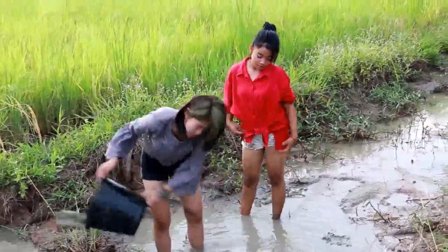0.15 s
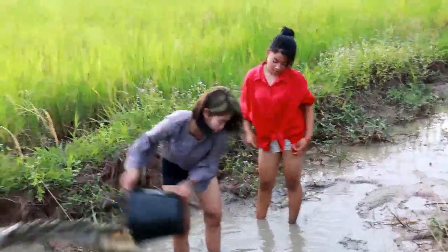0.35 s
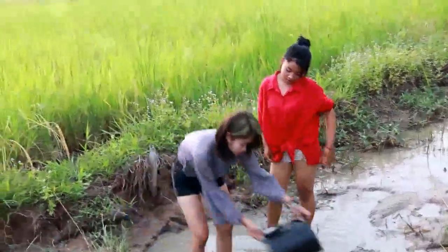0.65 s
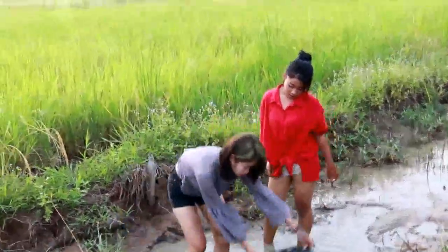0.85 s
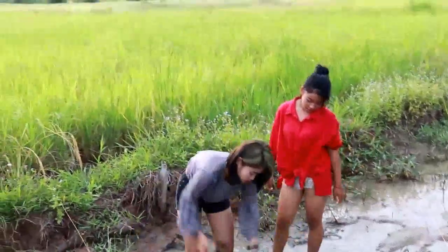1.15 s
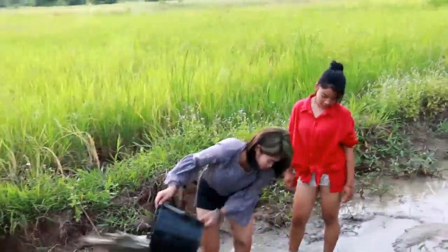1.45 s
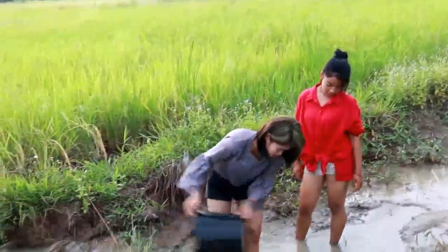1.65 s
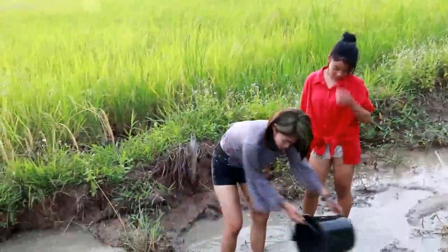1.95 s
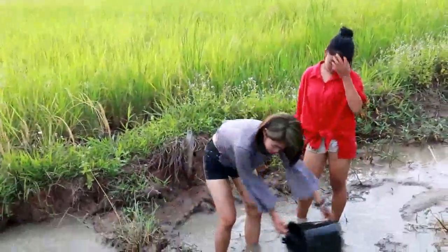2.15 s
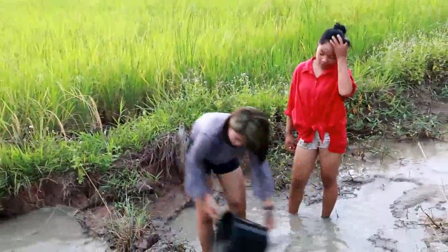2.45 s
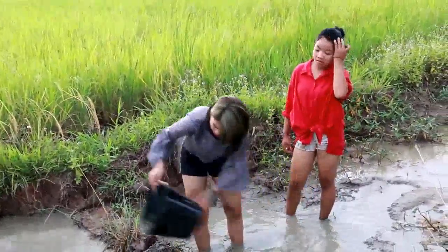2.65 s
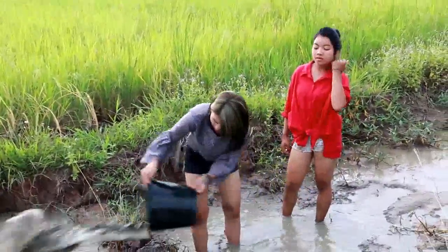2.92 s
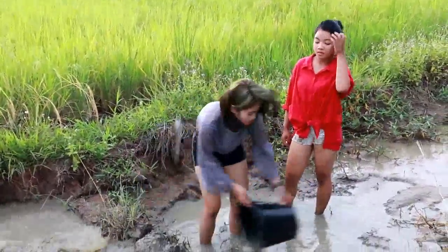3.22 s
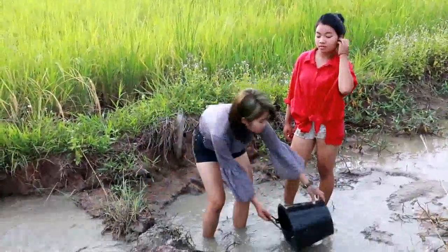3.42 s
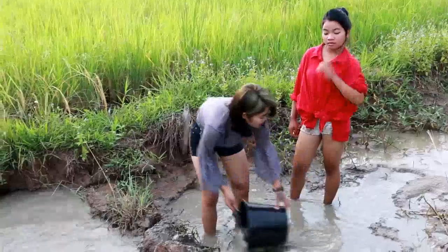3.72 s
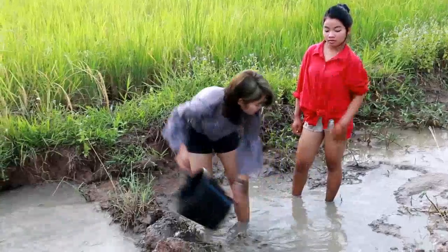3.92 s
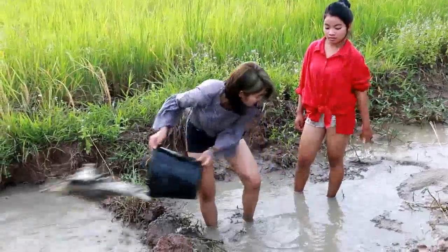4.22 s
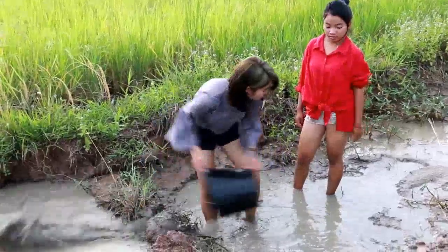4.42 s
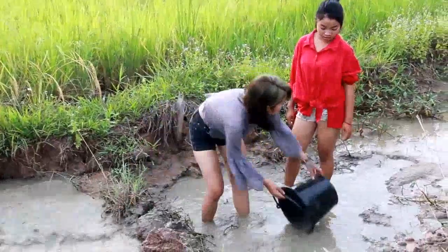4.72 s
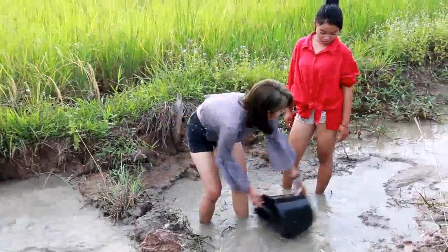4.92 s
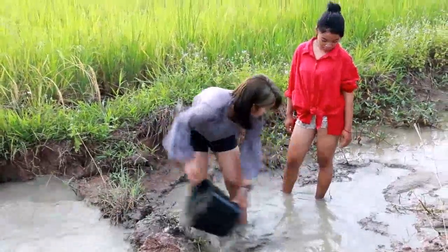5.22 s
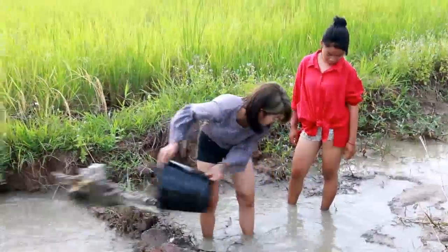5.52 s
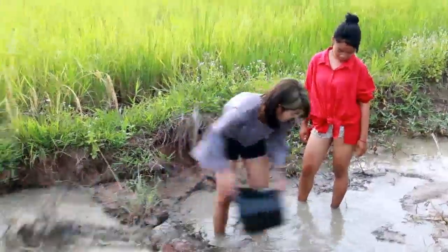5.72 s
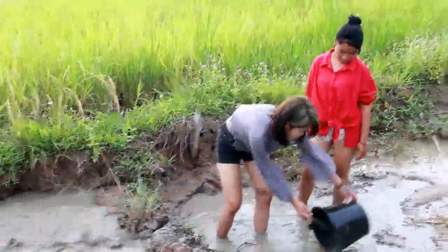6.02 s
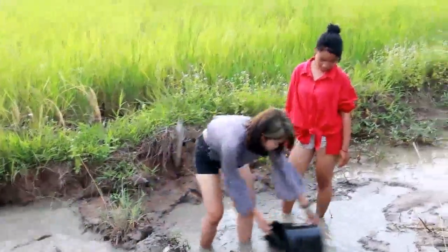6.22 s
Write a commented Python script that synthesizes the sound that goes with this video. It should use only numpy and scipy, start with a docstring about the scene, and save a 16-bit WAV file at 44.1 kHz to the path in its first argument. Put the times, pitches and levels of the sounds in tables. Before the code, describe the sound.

A bucket dips with a hollow knock, water churns, then a load is thrown and smacks down in a dense, short splash that rains away in drops and bubbles. This repeats five times in just over six seconds, with one small handle click midway. The microphone is fairly near, in an open field with only a faint short echo from mud banks; a distant engine wavers quietly beneath.

```python
"""In a muddy ditch someone bails with a plastic bucket: five loads of water are flung onto a shallow pool.
Each load lands as a dense splash of shaped droplet clicks and short bubble tones, then rains back as
drops and froth. Decaying sines make the big air pockets, the bucket's hollow knocks and a click of its
handle; noise bursts make the wet slaps. Stirred water patters and churns between throws; far off an engine
hums as two wavering sines, and filtered noise gives the open field and a distant rushing."""
import sys
import numpy as np
from scipy import signal
from scipy.fft import rfft, irfft
from scipy.io import wavfile
from scipy.ndimage import uniform_filter1d

SR = 44100
rng = np.random.default_rng(int(sys.argv[2]) if len(sys.argv) > 2 else 0)


def generate_wav(sig):
    """Save sig (samples, or channels by samples) to the path in sys.argv[1] as 16-bit PCM at SR."""
    pcm = np.round(np.clip(np.atleast_2d(sig).T, -1, 1) * 32767).astype(np.int16)
    wavfile.write(sys.argv[1], SR, pcm)


N = 280476
TIME = np.arange(N) / SR


def amp(db):
    """Level law: 20 dB is a tenfold amplitude."""
    return 10 ** (np.asarray(db) / 20)


def evened(x):
    """Power normalisation: scales x to rms 1."""
    return x / np.sqrt(np.mean(x ** 2) + 1e-20)


def add(mix, start_s, sound):
    """Superposition: adds a sound into the mix from its start, cut at the end of the mix."""
    part = mix[round(start_s * SR):][:len(sound)]
    part += sound[:len(part)]


def coloured(x, spectrum):
    """Linear filtering: weights x by a (pitch_hz, gain_db) curve and returns it at rms 1."""
    hz, db = np.transpose(spectrum)
    f = np.fft.rfftfreq(N, 1 / SR)
    gain = amp(np.interp(np.log(f + 1), np.log(hz), db))
    return evened(irfft(rfft(x) * gain, N))


def drift(corner_hz):
    """Low-pass random modulation: noise that varies mostly below corner_hz, at rms 1."""
    f = np.fft.rfftfreq(N, 1 / SR)
    return evened(irfft(rfft(rng.standard_normal(N)) / (1 + (f / corner_hz) ** 4), N))


def level(spells, fade_s=0.0047):
    """Amplitude envelopes: sums spells of (times in s, levels in dB), each faded in and out."""
    gain = np.zeros(N)
    for times, levels in spells:
        to_edge = np.minimum(TIME - times[0], times[-1] - TIME)
        fade = np.clip(to_edge / fade_s, 0, 1) ** .5
        gain += amp(np.interp(TIME, times, levels)) * fade
    return gain


def ping(hz, t60, climb, onset_cycles):
    """Damped resonance: a decaying sine under a peak-1 envelope, climbing by octaves over its t60."""
    t = np.arange(int(t60 * SR) + 8) / SR
    onset = 1 - np.exp(-(t * hz / onset_cycles) ** 2)
    shape = onset * np.exp(-np.log(1000) * t / t60)
    phase = 2 * np.pi * np.cumsum(hz * 2 ** (climb * t / t60)) / SR
    return shape / shape.max() * np.sin(phase)


def swarm(per_s, lo_hz, hi_hz, cycles, spread_db, climb=0.38, count=60):
    """Bubble resonance in bulk: rising tones of random strength and moment, with equal power per Hz."""
    out = np.zeros(N)
    for hz in np.geomspace(lo_hz, hi_hz, count):
        life, octaves = rng.uniform([.5, 0], [1.5, climb])
        moment, size, sign = rng.random((int(per_s * N / SR / count) + 1, 3)).T
        sizes = np.sign(sign - .5) * amp(-spread_db * np.log(size + .03))
        tone = ping(hz, life * cycles / hz, octaves, onset_cycles=0.24)
        tone = tone * np.sqrt(hz) / (np.linalg.norm(tone) * np.linalg.norm(sizes))
        for start_s, gain in zip(moment * N / SR, sizes):
            add(out, start_s, gain * tone)
    return evened(out)


def fizz(per_s):
    """Impulsive impact noise: bare clicks of fine droplets, random in size and moment."""
    return evened(rng.standard_normal(N) * (rng.random(N) < per_s / SR))


def patched(x, patchy_db, band_size=9, time_size=9):
    """Time-frequency modulation: random gains raise and lower small patches of the noise."""
    z = signal.stft(x, nperseg=512, noverlap=384)[2]
    patches = uniform_filter1d(rng.standard_normal(z.shape), band_size, axis=0)
    patches = uniform_filter1d(patches, time_size, axis=1)
    return signal.istft(z * amp(patchy_db * evened(patches)), nperseg=512, noverlap=384)[1][:N]


def steady(x, size):
    """Running power normalisation: evens a texture over about size samples and keeps its grain."""
    power = uniform_filter1d(uniform_filter1d(x ** 2, size), size)
    return x / np.sqrt(abs(power) + 1e-6)


# Relative spectrum of the open-air wash: pitch_hz [Hz], gain_db [dB]
AIR_SPECTRUM = [(20, -21), (35, -11), (55, -19.5), (90, -2), (135, -4), (180, -7), (300, -8.5), (550, -14),
                (900, -10), (1400, -10.5), (2200, -36), (4500, -37), (10000, -36), (15000, -44)]
# Swell and fade of the faraway rushing, before its flicker: time_s [s], level_db [dB]
RUSH_LEVELS = [(0, -52.5), (1.6, -49), (2.1, -42.5), (3.0, -51), (3.65, -49.5), (4.05, -40), (4.8, -41.5),
               (5.7, -46), (6.36, -48)]
AIR_DB = -42  # mean level in dB of the drifting wash


def field(rush_db=0.0):
    """Broadband ambient noise: an open-air wash drifts slowly and a faraway rushing swells and flickers."""
    wash = amp(AIR_DB + 2.1 * drift(1.1)) * coloured(rng.standard_normal(N), AIR_SPECTRUM)
    rush = coloured(rng.standard_normal(N), [(300, -15.5), (750, -2.0), (1000, 1.0), (1400, -0.5),
                                             (1900, -13), (2600, -18.5), (4000, -50)])
    rush_levels = np.interp(TIME, *np.transpose(RUSH_LEVELS))
    return wash + rush * amp(rush_levels + rush_db + 1.2 * drift(19.0))


# The engine drifts in and out, before trims and wander:
# time_s [s], firing_tone_db [dB], octave_tone_db [dB]
ENGINE_LEVELS = [(0, -68, -78), (0.6, -53, -55), (2.0, -45, -50.5), (3.7, -49.5, -60), (4.9, -54, -50.5),
                 (6.36, -45.5, -48.5)]
FIRING_HZ = 58.2  # mean firing rate


def engine(firing_db=-2, octave_db=0.5, waver_rad=0.89):
    """Harmonic radiation: only the firing tone and its octave carry, sharing one wavering phase."""
    times, *columns = np.transpose(ENGINE_LEVELS)
    low, high = (np.interp(TIME, times, column) for column in columns)
    angle = 2 * np.pi * FIRING_HZ * TIME + waver_rad * drift(2.4)
    firing = amp(low + firing_db + 1.8 * drift(1.5)) * np.sin(angle)
    octave = amp(high + octave_db + 2.5 * drift(4.6)) * np.sin(2 * angle)
    return np.sqrt(2) * (firing + octave)


# Water slops, stirred by bucket, feet and the wash of a throw; levels drive the layers of sloshing:
# crest_s [s], rise_s [s], fall_s [s], patter_db [dB], churn_db [dB]
STIR_EVENTS = [(0.01, 0.029, 0.12, -47.5, -41), (0.106, 0.12, 0.2, -41, -38.5),
               (0.32, 0.047, 0.055, -56, -31.5), (0.78, 0.048, 0.066, -38, -37.5),
               (0.99, .12, 0.15, -48.5, -45), (1.085, 0.037, 0.013, -42, -31), (1.13, 0.035, 1, -45.5, -41),
               (1.37, 0.041, 0.097, -42.5, -41), (2.39, 0.13, 0.028, -48.5, -35.5),
               (2.48, 0.073, 0.32, -46, -40), (2.706, 0.17, 0.23, -45.5, -38),
               (3.045, 0.0078, 0.014, -40.5, -52), (3.29, .15, 0.038, -55, -29.5),
               (3.695, 0.1, 0.34, -48.5, -38), (3.95, 0.098, 0.14, -49, -44),
               (4.059, 0.098, 0.15, -42.5, -40), (4.42, .012, 0.075, -43, -58),
               (4.69, 0.096, 0.13, -45.5, -34), (5.03, 0.077, 0.22, -47.5, -44.5),
               (5.137, .02, 0.029, -38, -38), (5.25, .1, .15, -54, -58), (5.375, 0.17, 0.34, -40, -37),
               (5.765, 0.074, 0.035, -43, -53), (6.267, 0.051, 0.11, -50, -45),
               (6.334, 0.011, 0.056, -41, -34)]
STIR_DEPTH_DB = 20  # a stir rises from, and sinks back to, this far below its crest
LAP_PATTER_DB, LAP_CHURN_DB = -55.5, -54.5  # the ditch never quite rests
LEAD_S, LEAD_DB, LEAD_RISE_DB = 0.046, -47, 10  # stray drops fly ahead of the sheet
RAIN_SAG_DB_PER_S = 19  # thrown-up drops thin out while they fall back
DRAIN_S, DRAIN_DB = 0.31, 25  # then the last trickles die away
SETTLE_S, SETTLE_DB = 0.41, 29  # the churned pool calms


def agitation():
    """Excitation and decay: gains of drops and churning as throws rain back and stirs swell and sink."""
    drops, churns = [], []
    for start_s, swell_s, *_, rain_db, rain_s, churn_db in THROW_EVENTS:
        crest_s = start_s + swell_s
        rain_end_s = crest_s + rain_s
        last_db = rain_db - RAIN_SAG_DB_PER_S * rain_s
        drops.append(([start_s - LEAD_S, start_s, crest_s, rain_end_s, rain_end_s + DRAIN_S],
                      [LEAD_DB - LEAD_RISE_DB, LEAD_DB, rain_db, last_db, last_db - DRAIN_DB]))
        churns.append(([crest_s, crest_s + SETTLE_S], [churn_db, churn_db - SETTLE_DB]))
    arch = STIR_DEPTH_DB * np.array([-1, 0, -1])
    for crest_s, rise_s, fall_s, patter_db, churn_db in STIR_EVENTS:
        times = [crest_s - rise_s, crest_s, crest_s + fall_s]
        drops.append((times, patter_db + arch))
        churns.append((times, churn_db + arch))
    return np.hypot(level(drops), amp(LAP_PATTER_DB)), np.hypot(level(churns), amp(LAP_CHURN_DB))


# Relative spectrum of pattering drops: pitch_hz [Hz], gain_db [dB]
PATTER_SPECTRUM = [(650, -33), (1100, 1.5), (1310, -8.5), (1550, -3.5), (1980, -4), (2860, -5),
                   (5000, -13.5), (6500, -40), (11000, -120)]
# Relative spectrum of churned water: pitch_hz [Hz], gain_db [dB]
CHURN_SPECTRUM = [(120, -42), (200, -10.5), (276, 0.5), (313, -5.5), (438, -3), (545, -11), (646, -3),
                  (739, 1.5), (897, 5), (1240, -19), (1500, -13), (1950, -47), (3300, -120)]
# Relative spectrum of fine mist: pitch_hz [Hz], gain_db [dB]
MIST_SPECTRUM = [(3000, -20), (4500, -3.5), (5500, 2), (10000, -3.5), (14500, -11)]


def sloshing(patter_db=1.0, churn_db=-3, mist_db=-7.0, spatter_db=-16, burble_db=-12):
    """Impact and bubble resonance: drops patter, churned water rings lower and fine mist hisses on top."""
    patter = fizz(per_s=12000) + amp(-7.5) * swarm(
        per_s=1100, lo_hz=1119, hi_hz=4500, cycles=31.5, spread_db=3.0, climb=0.87)
    patter = steady(coloured(patched(patter, patchy_db=2.7), PATTER_SPECTRUM), size=1100)
    churn = swarm(per_s=900, lo_hz=208.7, hi_hz=1516, cycles=13.2, spread_db=3.0, count=40)
    churn = steady(coloured(churn, CHURN_SPECTRUM), size=900)
    mist = fizz(per_s=12000) + amp(-19) * fizz(per_s=220)  # a few near droplets tick out of the hiss
    mist = steady(coloured(patched(mist, patchy_db=2.0), MIST_SPECTRUM), size=1500)
    mist = mist * amp(1.45 * drift(51))
    # larger drops tap on the mud
    spatter = swarm(per_s=150, lo_hz=1290, hi_hz=6030, cycles=4.2, spread_db=5.5, count=30)
    # slower, deeper bubbles
    burble = swarm(per_s=70, lo_hz=249, hi_hz=506, cycles=19, spread_db=-0.5, count=20)
    drops, churning = agitation()
    falling = amp(patter_db) * patter + amp(mist_db) * mist + amp(spatter_db) * spatter
    stirred = amp(churn_db) * churn + amp(burble_db) * burble
    return drops * falling + churning * stirred


# The bucket meets the water and the air in it rings briefly, before the trim knock_db:
# start_s [s], level_db [peak dB], pitch_hz [Hz]
KNOCK_EVENTS = [(0.246, -27.5, 818), (0.323, -31, 783), (0.999, -21, 910), (1.087, -24.5, 900),
                (1.346, -28, 896), (1.388, -28, 875), (3.075, -29.5, 1200), (5.139, -26.5, 970),
                (5.344, -22.5, 850), (5.37, -23.5, 870), (6.328, -44, 869)]


def knocks(knock_db=-1.5, t60=0.048):
    """Damped air resonance: the hollow bucket rings for a moment."""
    out = np.zeros(N)
    for start_s, level_db, pitch_hz in KNOCK_EVENTS:
        add(out, start_s, amp(level_db + knock_db) * ping(pitch_hz, t60, climb=0, onset_cycles=1.6))
    return out


# Flat smacks of water and mud, before the trim slap_db:
# start_s [s], level_db [dB], centre_hz [Hz], t60_s [s]
SLAP_EVENTS = [(0.321, -24.5, 1560, 0.035), (0.553, -26, 6000, .02), (0.560, -24, 1280, 0.021),
               (0.582, -4.5, 1700, 0.042), (0.779, -25, 6900, 0.023), (0.806, -22, 2870, .02),
               (1.077, -13, 1740, 0.05), (1.128, -27.5, 8100, 0.013), (1.371, -21, 1600, 0.035),
               (1.819, -10, 1100, .02), (1.832, -8, 1960, 0.041), (2.302, -30, 10100, .015),
               (2.326, -22.5, 2030, 0.022), (2.454, -31.5, 8000, .025), (2.494, -26, 5600, 0.027),
               (3.078, -23, 3400, 0.044), (3.147, -10, 2400, 0.041), (3.452, -26, 9000, .017),
               (3.696, -25.5, 3520, 0.02), (3.899, -29, 8000, 0.014), (4.288, -28.5, 7550, 0.012),
               (4.417, -25, 8360, 0.069), (4.504, -6, 1930, 0.028), (4.553, -2, 1100, 0.0099),
               (4.590, 2.5, 1460, 0.0082), (4.802, -15.5, 2600, 0.013), (4.836, -25, 4520, .03),
               (5.095, -31, 10500, 0.013), (5.129, -22, 4300, 0.017), (5.141, -12.5, 1480, 0.0083),
               (5.386, -22.5, 10000, .009), (5.477, -32, 5540, .04), (5.798, -23, 7300, 0.055),
               (6.329, -37, 2500, 0.025)]


def slaps(width=1.44, slap_db=-8, rise_s=0.00036):
    """Impact noise: a smack is a sudden, quickly dying band of noise about one pitch region."""
    out = np.zeros(N)
    t = np.arange(4096) / SR
    for start_s, level_db, centre_hz, t60_s in SLAP_EVENTS:
        edges = [centre_hz / width, centre_hz * width]
        band = signal.butter(3, edges, "band", fs=SR, output="sos")
        shape = (1 - np.exp(-t / rise_s)) * np.exp(-np.log(1000) * t / t60_s)
        burst = signal.sosfilt(band, rng.standard_normal(len(t)) * shape)
        burst *= np.linalg.norm(shape) / np.linalg.norm(burst)  # same energy whatever the band
        add(out, start_s, amp(level_db + slap_db) * burst)
    return out


# Air pockets and bubbles, and the ringing click of the bucket handle near 2.45 s:
# start_s [s], level_db [envelope peak dB], pitch_hz [Hz at the start], t60_s [s]
RINGING_EVENTS = [(0.591, -19, 407, 0.034), (0.641, -14, 952, 0.056), (0.749, -29, 325, .08),
                  (1.08, -29, 335, 0.054), (1.189, -30.5, 370, 0.041), (1.354, -29, 365, 0.14),
                  (1.404, -27.5, 328, 0.067), (1.517, -26.5, 297, 0.037), (1.817, -11, 313, 0.014),
                  (1.841, -3.5, 310, 0.022), (1.889, -28, 480, .035), (1.933, -21, 3330, 0.035),
                  (1.978, -25, 350, .04), (2.157, -32, 3300, .02), (2.197, -32, 3840, 0.023),
                  (2.240, -32, 3440, 0.018), (2.387, -27, 640, .043), (2.391, -24.5, 298, .04),
                  (2.472, -35.5, 400, 0.044), (2.556, -30.5, 290, 0.041), (2.453, -33.5, 2850, 0.055),
                  (2.455, -25.5, 3800, 0.0092), (2.605, -29, 290, 0.025), (2.807, -30.5, 274, 0.11),
                  (3.134, -15, 240, 0.037), (3.146, -6.5, 408, 0.0081), (3.148, -9.5, 770, 0.021),
                  (3.695, -24, 349, 0.042), (3.946, -27, 2320, 0.023), (4.026, -31.5, 317, 0.13),
                  (4.119, -31, 310, 0.056), (4.196, -29.5, 412, 0.044), (4.505, -10, 376, 0.019),
                  (4.531, -14.5, 268, 0.018), (4.572, -14, 750, 0.042), (5.513, -28.5, 251, 0.087),
                  (5.562, -30, 2350, 0.025), (5.821, -16, 230, 0.015), (5.827, -10.5, 1580, 0.025),
                  (5.937, -21.5, 950, 0.028), (5.980, -23.5, 704, 0.043)]
CLIMB_OCTAVES = 0.31  # each ring's pitch climbs this much over its t60


def air_pockets_and_handle(onset_cycles=0.99):
    """Damped resonance: air pockets, bubbles and one click of the handle ring as decaying, rising tones."""
    out = np.zeros(N)
    for start_s, level_db, pitch_hz, t60_s in RINGING_EVENTS:
        add(out, start_s, amp(level_db) * ping(pitch_hz, t60_s, CLIMB_OCTAVES, onset_cycles))
    return out


# Relative spectrum of tearing spray: pitch_hz [Hz], gain_db [dB]
SPRAY_SPECTRUM = [(710, -16), (1200, -3), (1630, -5), (1950, -3.5), (2240, -3), (10500, -18.5),
                  (13800, -20), (14500, -43), (15000, -41)]
# Relative spectrum of the splash's body: pitch_hz [Hz], gain_db [dB]
BODY_SPECTRUM = [(76, -35), (130, -19), (350, -7), (567, -11.5), (901, 1), (1180, -11), (1700, -5.5),
                 (2210, -60), (3740, -120)]
# A flung load meets the pool; levels come before the layer trims:
# start_s [s], swell_s [s], collapse_s [s], spray_db [dB at the crest],
# front_db [dB of the start below the crest], sag_db [dB lost over the collapse],
# body_rel_db [dB against the spray], rain_db [dB of falling drops], rain_s [s of their fall], churn_db [dB]
THROW_EVENTS = [(0.549, .037, 0.088, -18, 22.5, 14, -3.5, -37, .28, -23.5),
                (1.805, 0.018, 0.14, -20, 16.5, 13.5, 1.5, -32.5, 0.31, -21.5),
                (3.085, 0.068, 0.06, -17.5, 23.5, 26, 3, -32.5, 0.19, -27),
                (4.486, 0.026, 0.082, -19, 14.5, 8, 1.5, -35, 0.32, -27),
                (5.795, 0.021, 0.15, -19.5, 14, 17.5, -1, -31.5, 0.22, -22)]
BODY_LAG_DB = 1.5  # the cavities gain on the spray as the sheet collapses


def landings(spray_db=-0.5, body_db=-2):
    """Impact and cavity resonance: a sheet breaks into tearing spray above a body of short-lived cavities."""
    spray = fizz(per_s=14000) + amp(-13.0) * swarm(
        per_s=3000, lo_hz=1096, hi_hz=8400, cycles=41, spread_db=10.0)
    spray = steady(coloured(patched(spray, patchy_db=4.0), SPRAY_SPECTRUM), size=500)
    body = swarm(per_s=1800, lo_hz=136.0, hi_hz=1705, cycles=11.4, spread_db=2.5, count=40)
    body = steady(coloured(body, BODY_SPECTRUM), size=500)
    sprays, bodies = [], []
    for start_s, swell_s, collapse_s, crest_db, front_db, sag_db, body_rel_db, *_ in THROW_EVENTS:
        times = start_s + np.cumsum([0, swell_s, collapse_s])
        shape = crest_db - np.array([front_db, 0, sag_db])
        sprays.append((times, shape))
        bodies.append((times, shape + body_rel_db + BODY_LAG_DB * np.array([-1, 0, 1])))
    return amp(spray_db) * spray * level(sprays) + amp(body_db) * body * level(bodies)


def banks(x, wet_db, t60):
    """Diffuse scattering: the mud banks return a short, faint, decaying echo."""
    t = np.arange(8192) / SR
    taps = rng.standard_normal(len(t)) * np.exp(-np.log(1000) * t / t60) * (t > .003)
    return x + amp(wet_db) * signal.oaconvolve(x, taps / np.linalg.norm(taps))[:N]


def scene():
    """Superposition of direct and scattered sound: water echoes off the banks, near sounds arrive direct."""
    water = banks(landings() + sloshing(), wet_db=-18.5, t60=0.16)
    near = air_pockets_and_handle() + knocks() + slaps()
    return (water + near + field() + engine())[None]


CUTOFF_HZ = 14700  # upper edge of the whole sound


def record(dry):
    """Band limitation: a linear-phase low-pass removes the treble above the cutoff."""
    lowpass = signal.firwin(401, CUTOFF_HZ, window=("kaiser", 9), fs=SR)
    return signal.oaconvolve(dry, lowpass[None], "same")


dry = scene()
out = record(dry)
generate_wav(out)
```